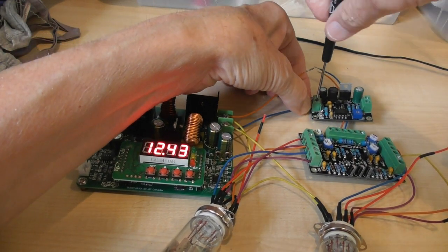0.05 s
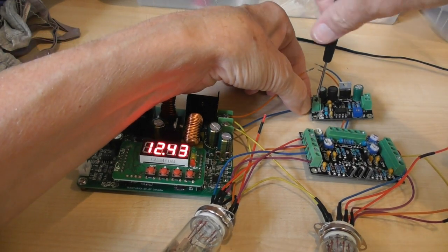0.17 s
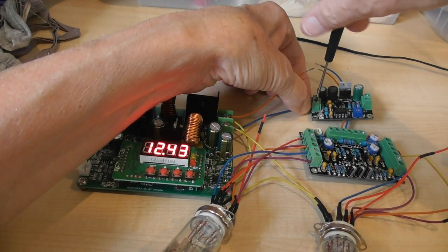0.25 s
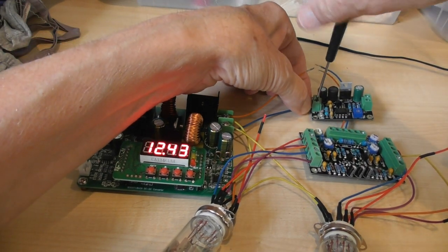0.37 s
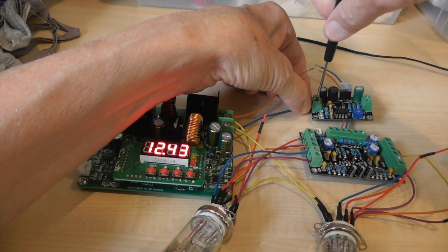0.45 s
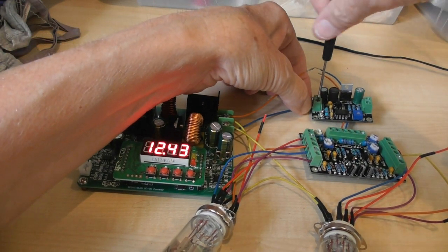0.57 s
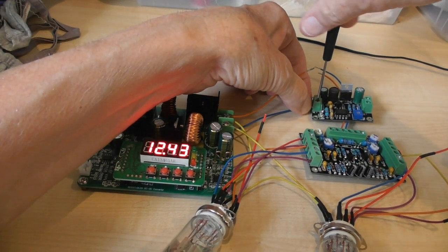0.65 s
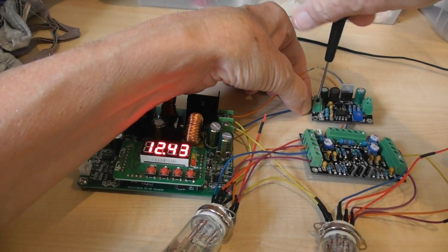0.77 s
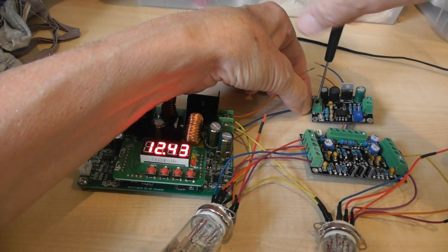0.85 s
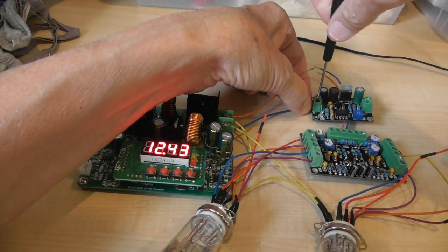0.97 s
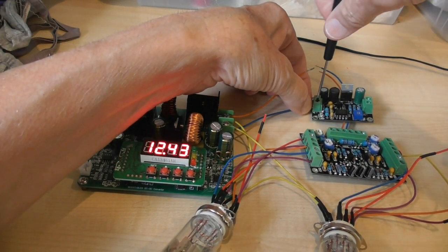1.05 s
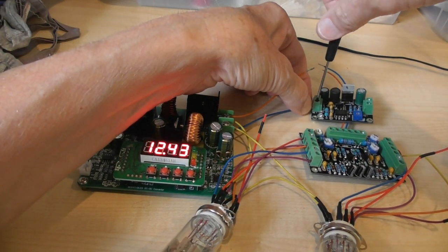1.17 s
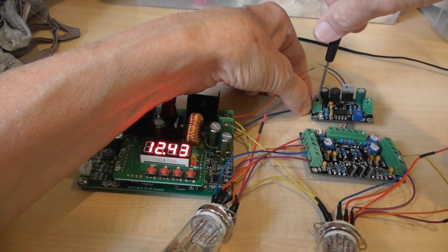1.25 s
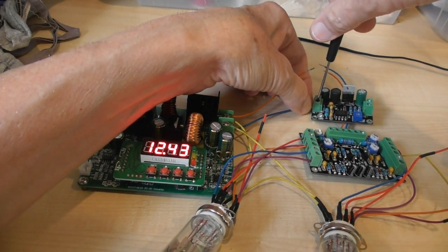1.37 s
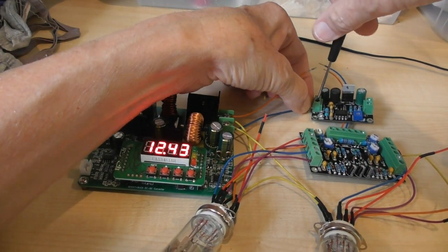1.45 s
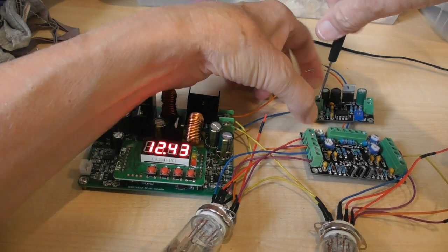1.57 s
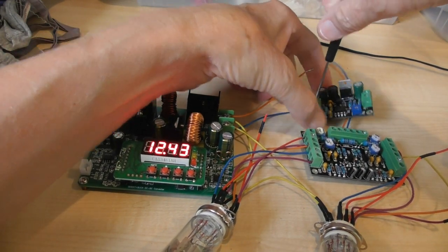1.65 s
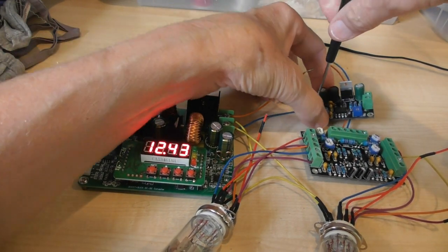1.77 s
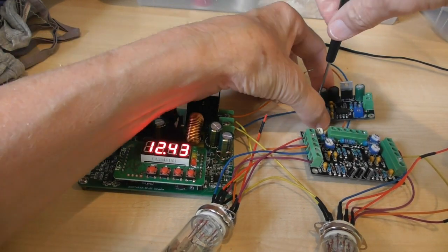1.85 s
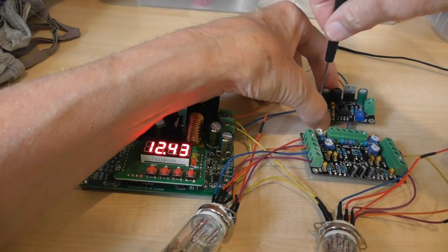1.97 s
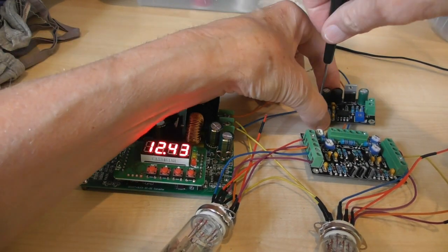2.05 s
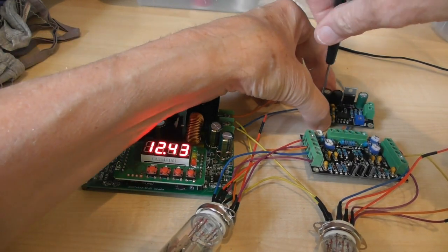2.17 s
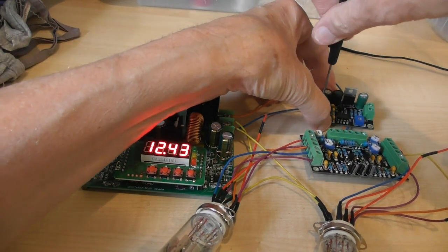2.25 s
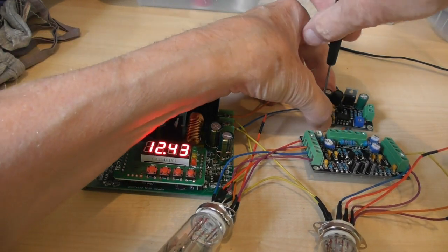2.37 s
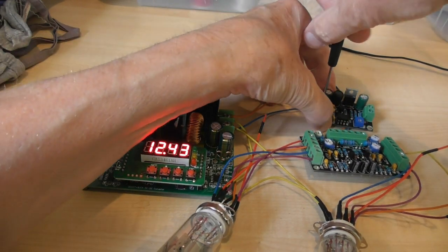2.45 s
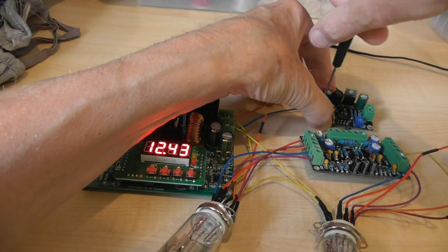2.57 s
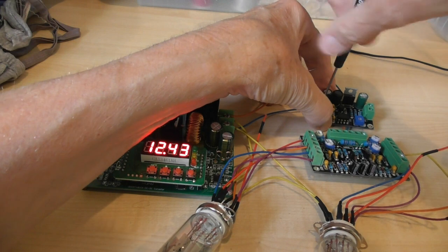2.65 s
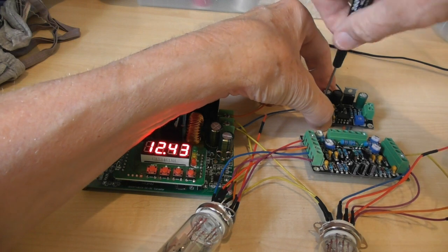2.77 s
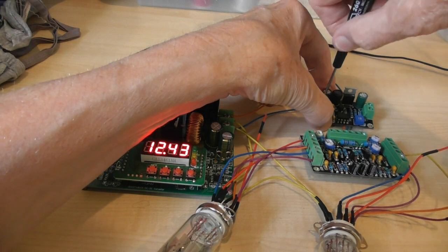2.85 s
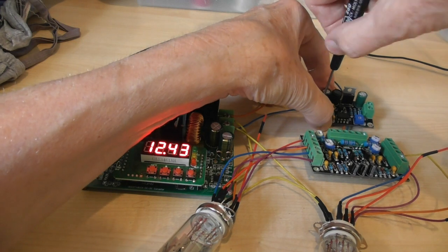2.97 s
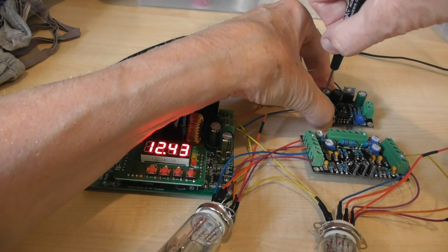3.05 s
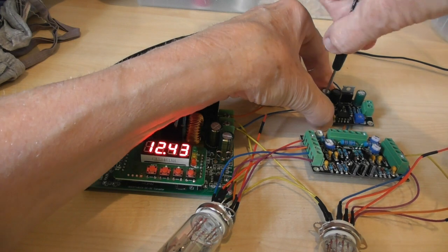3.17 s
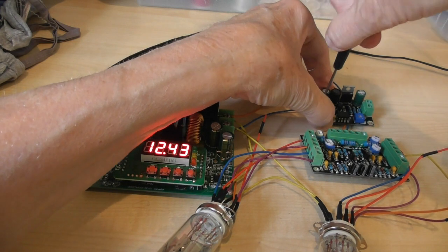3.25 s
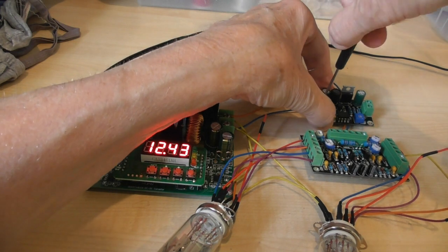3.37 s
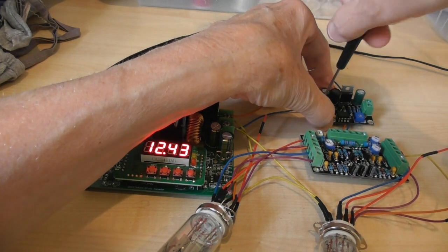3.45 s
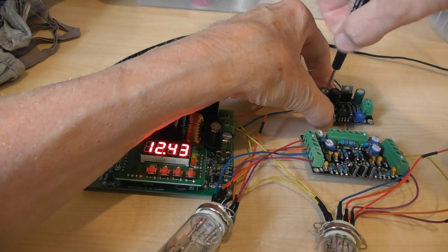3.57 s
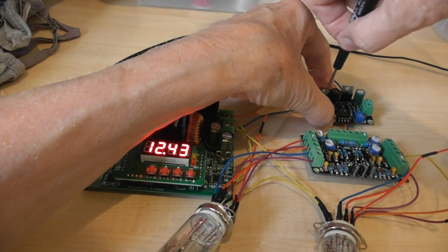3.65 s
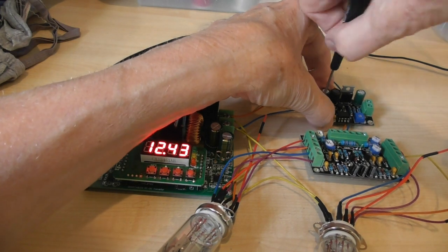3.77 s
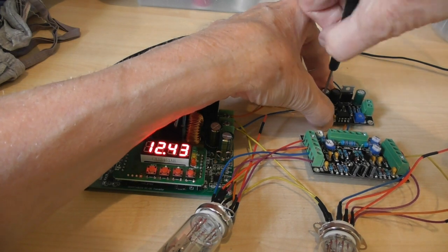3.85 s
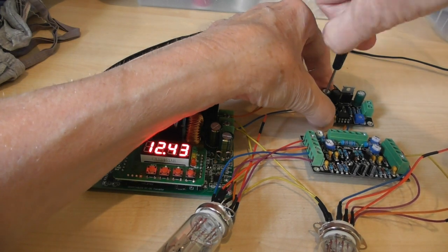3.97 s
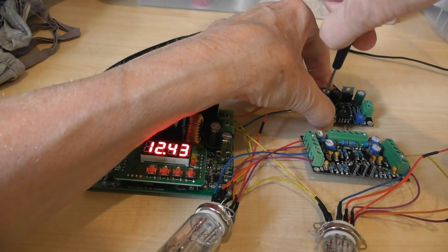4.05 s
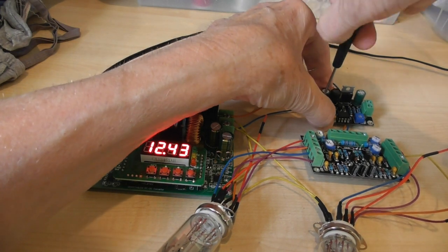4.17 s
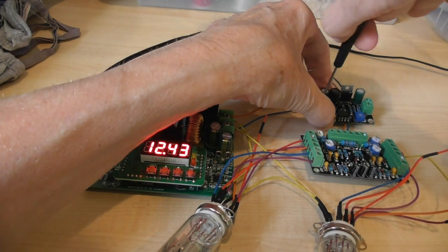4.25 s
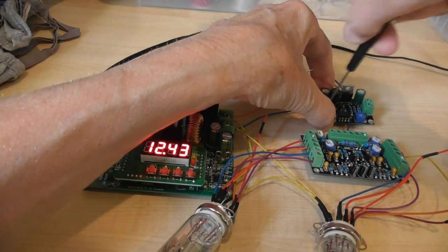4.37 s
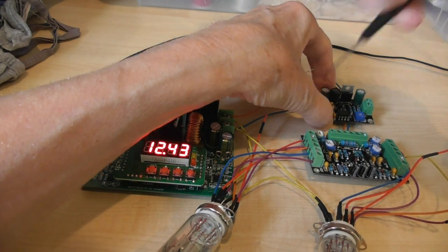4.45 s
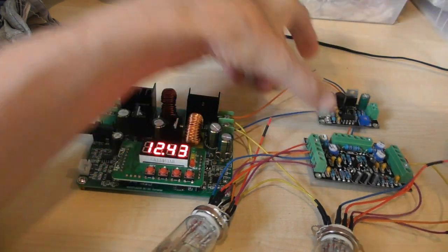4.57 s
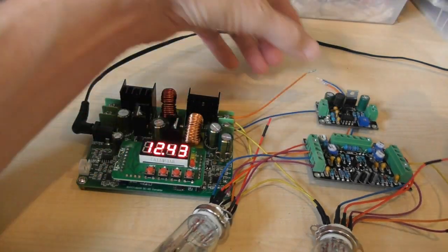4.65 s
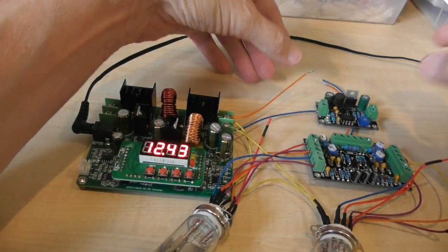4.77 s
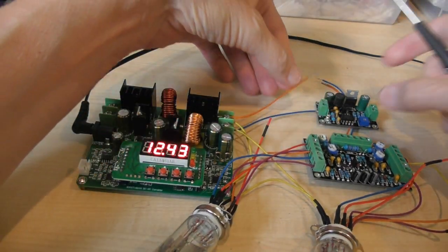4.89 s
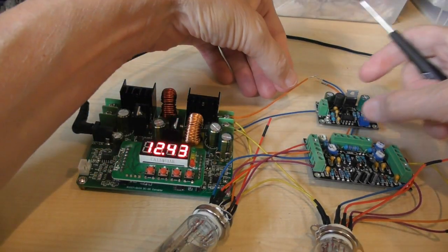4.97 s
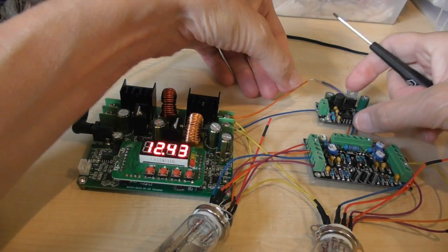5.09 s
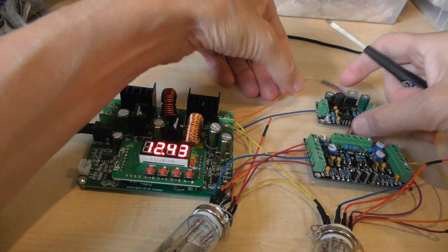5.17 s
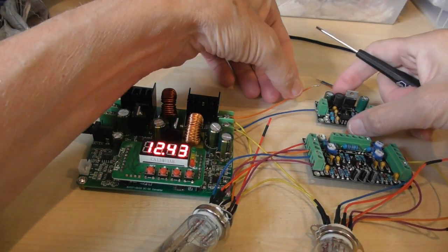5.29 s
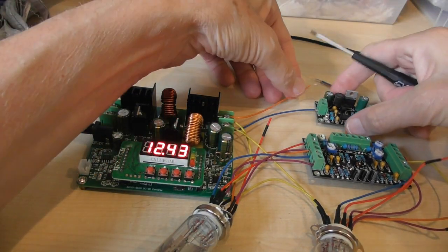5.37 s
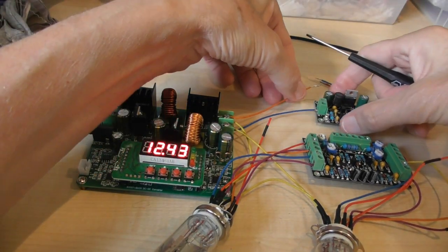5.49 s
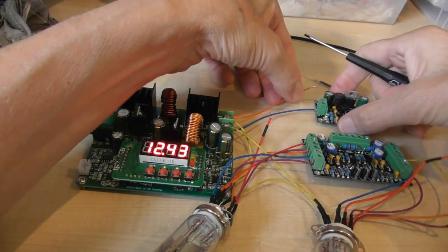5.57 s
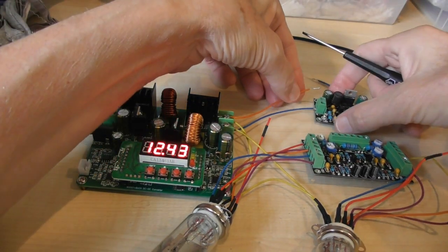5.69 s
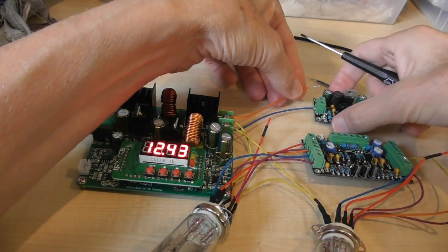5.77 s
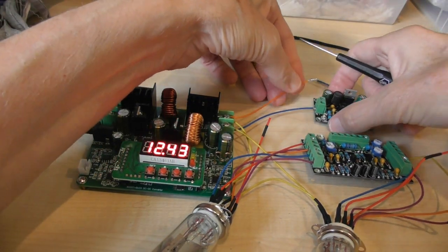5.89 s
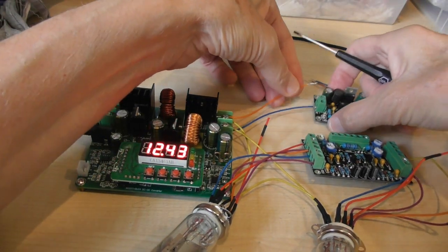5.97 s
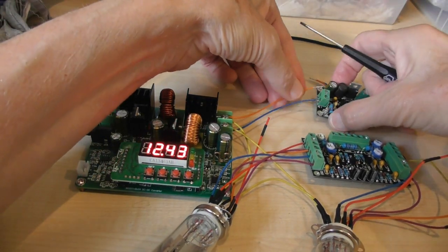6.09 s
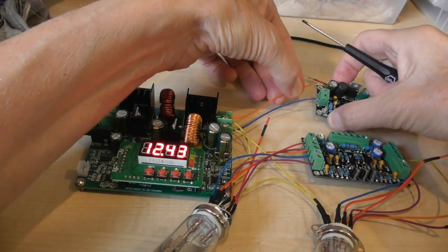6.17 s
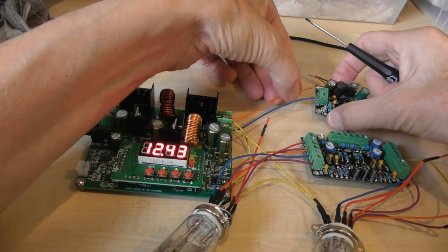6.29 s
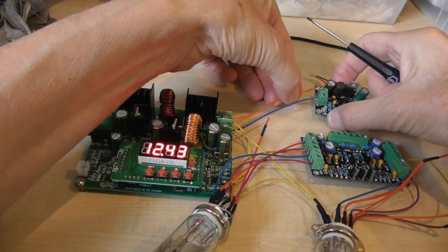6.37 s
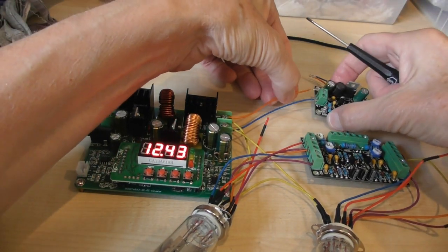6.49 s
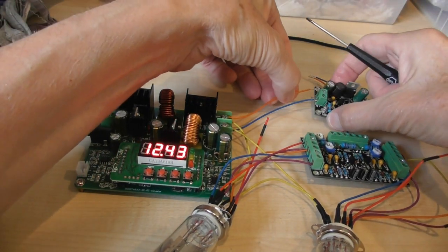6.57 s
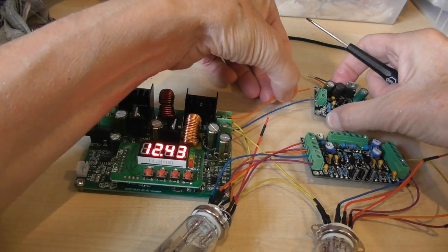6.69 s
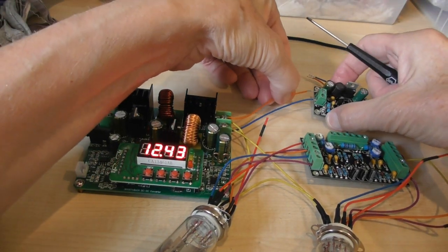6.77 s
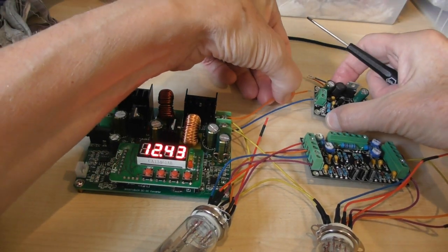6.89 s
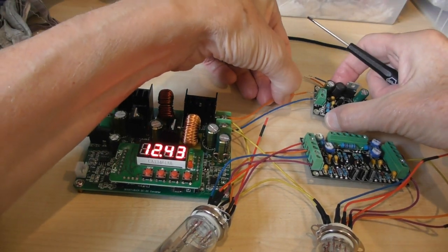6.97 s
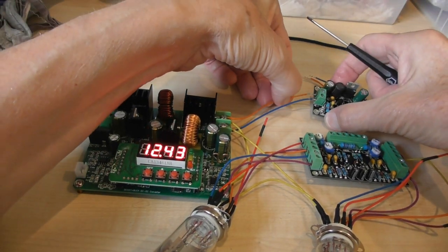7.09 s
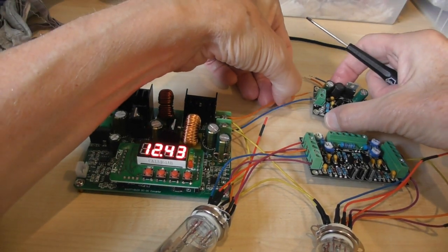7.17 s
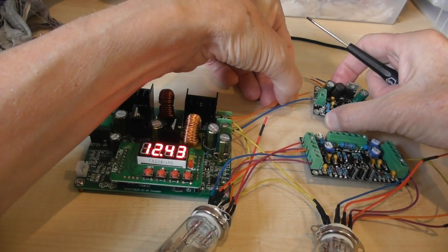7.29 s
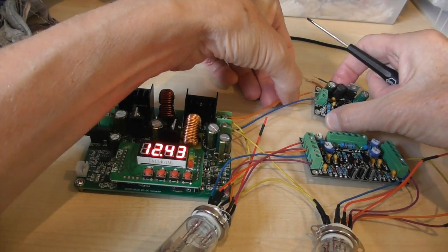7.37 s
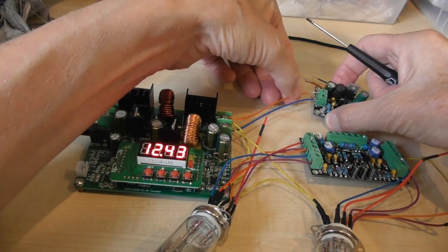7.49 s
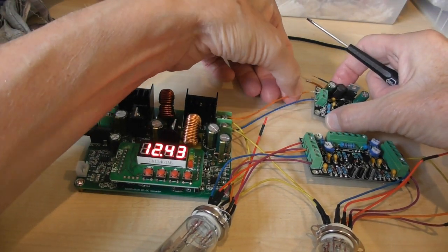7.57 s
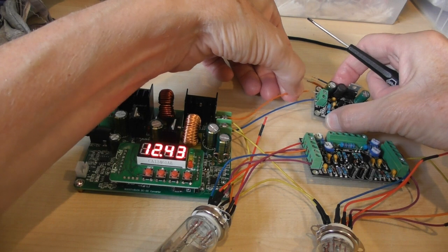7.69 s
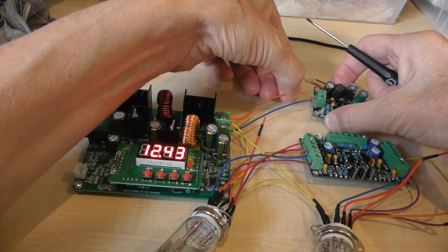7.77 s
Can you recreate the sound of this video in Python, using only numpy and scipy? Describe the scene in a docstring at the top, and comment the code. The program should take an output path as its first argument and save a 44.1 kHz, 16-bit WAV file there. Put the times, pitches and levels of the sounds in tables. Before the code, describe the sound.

A small screwdriver works the screw terminals of a circuit board on a wooden bench. The blade and wire ends tick thinly against metal and plastic while the board drags and knocks lightly on the wood. Early on, a screw gives two faint, high squeaks. The clicks and knocks grow busier and sharper past the middle, then thin out. The sound is close, in a quiet room with a soft, steady hiss.

```python
"""At a wooden bench in a quiet room, a small screwdriver works the screw terminals of a circuit board.
The board drags and knocks on the bench top: friction drives its low modes, and impacts set them ringing.
Blade and wire ends tick against metal and plastic, and twice the screw squeaks by stick-slip in its thread.
Direct sound and short reflections reach two microphone ports over a steady hiss."""
import sys
import numpy as np
from scipy import signal
from scipy.fft import rfft, irfft, next_fast_len
from scipy.io import wavfile
from scipy.ndimage import uniform_filter1d

SR = 44100
rng = np.random.default_rng(int(sys.argv[2]) if len(sys.argv) > 2 else 0)


def int16_out(signal):
    """Quantize to a 16-bit WAV file."""
    q = np.round(np.clip(np.atleast_2d(signal).T, -1, 1) * 32767)
    wavfile.write(sys.argv[1], SR, q.astype(np.int16))


N = 345303

# normal modes of the bench top: f/Hz, level/dB, nominal T60/s
BENCH_MODES = [(212, -12.5, 0.15), (253.8, -7.5, 0.048), (295.4, 0.5, 0.069), (332.7, -3, 0.15),
               (367, -1.5, 0.13), (419.5, -1.5, 0.065), (457.3, -3, 0.13), (550, -12, 0.024),
               (602, 4, 0.017), (749.4, -3, 0.017), (752.6, 4, 0.029), (801, 9, 0.029), (869.6, 9, 0.078),
               (980, -1.5, 0.03), (1230, -16, 0.052), (1228, -5, 0.048), (1832, -4.5, 0.09),
               (2050, -10, 0.04)]
UPPER_MODES_HZ = 600  # hard contact weights the modes above this


def gain_of(db):
    """Amplitude ratio of a level in decibels."""
    return 10 ** (np.asarray(db) / 20)


def unit_rms(x):
    """Normalisation to an rms of 1."""
    return x / np.sqrt(np.mean(x ** 2) + 1e-20)


def curve_at(points, hz):
    """Interpolation on a logarithmic frequency axis."""
    f, value = np.transpose(points)
    return np.interp(np.log(hz + 1), np.log(f + 1), value)


def filtered(x, response):
    """Linear filtering: the spectrum is multiplied by response(f)."""
    n = next_fast_len(x.shape[-1], real=True)
    return irfft(rfft(x, n) * response(np.fft.rfftfreq(n, 1 / SR)), n)[..., :x.shape[-1]]


def coloured(x, spectrum):
    """Spectral shaping by a curve of f/Hz, level/dB."""
    return filtered(x, lambda f: gain_of(curve_at(spectrum, f)))


def resonate(x, hz, width):
    """Forced response of a damped resonator, with gain near 1 at its centre."""
    r = np.exp(-np.pi * width / SR)
    return 2 * signal.lfilter([1 - r], [1, -r * np.exp(2j * np.pi * hz / SR)], x).real


def resonance(f, hz, width):
    """Complex frequency response of one mode, 1 at its centre."""
    return 1 / (1 + 2j * (f - hz) / width)


def add(mix, start, sound):
    """Superposition of a sound from a start time in seconds."""
    part = mix[round(start * SR):][:len(sound)]
    part += sound[:len(part)]


def room_hiss():
    """Stationary noise of room and microphone, as sum (mid) and difference (side) of the two ports."""
    # noise spectra: f/Hz, relative level/dB
    mid_spectrum = [(13, -16), (22, -1.5), (196, 8.5), (351, -1), (450, -24), (594, -3.5), (952, -6.5),
                    (1660, -12), (2070, 2), (2880, -23), (4370, -7), (5010, -20.5), (8490, -2.5),
                    (15200, -6), (16500, -29)]
    side_spectrum = [(13, -37), (22, -1), (181, -3.5), (371, -6.5), (926, -14.5), (2010, -45), (2370, -42),
                     (3310, -67), (6430, -68), (7600, -49), (8970, -31.5), (15200, -24.5), (16500, -51)]
    # narrow hums of the room: f/Hz, bandwidth/Hz, level/dB
    hums = [(43, 8, -77.5), (2050, 85, -93.5), (451, 20, -80.5), (950, 100, -87)]
    mid_noise, side_noise, hum_noise = rng.standard_normal((3, N))
    mid = gain_of(-72) * unit_rms(coloured(mid_noise, mid_spectrum))
    mid += sum(gain_of(db) * unit_rms(resonate(hum_noise, hz, width)) for hz, width, db in hums)
    side = gain_of(-68) * unit_rms(coloured(side_noise, side_spectrum))
    return np.array([mid + side, mid - side])


def friction(slips_per_s, spread_db, smooth, decay_s):
    """Sliding friction: random slips, each a decaying puff of noise, over smooth rubbing."""
    sizes = gain_of(spread_db * np.minimum(rng.exponential(1, N), 3))
    slips = sizes * (rng.random(N) < slips_per_s / SR)
    puffs = signal.lfilter([1], [1, -np.exp(-1 / (decay_s * SR))], slips)
    return unit_rms((unit_rms(puffs) + smooth) * rng.standard_normal(N))


def driven_bench(force, modes):
    """Modal superposition: each mode filters the force, and a broad resonance steepens its skirts."""
    def response(f):
        return sum(gain_of(db) * resonance(f, hz, 2.18 / t60) * resonance(f, hz, .32 * hz)
                   for hz, db, t60 in modes)
    return unit_rms(filtered(force, response))


def handling():
    """Forced vibration: dragging drives the bench modes, small parts scratch, an arm thuds on the wood."""
    # hands moving the board: t/s, drag/dB, hard edge/dB re drag, scratch/dB, arm thud/dB
    moves = [(0.0, -70, -5, -74.5, -79), (0.04, -57, -6, -76, -69), (0.11, -57.5, -9, -70.5, -74),
             (0.28, -52.5, -1.5, -66, -69.5), (0.33, -59, -8, -69, -71), (0.52, -60.5, -8.5, -70.5, -74),
             (0.57, -59, 3, -64.5, -78), (0.7, -62.5, -5, -69.5, -80), (0.98, -56, -7.5, -71.5, -74),
             (1.02, -62.5, 13, -65, -76), (1.09, -54.5, -11, -79, -79), (1.11, -57, -6.5, -66, -81),
             (1.37, -66.5, -6, -78.5, -75), (1.5, -58.5, 0.5, -71, -73), (1.55, -70, -6, -77, -74),
             (1.61, -73, 9, -70, -78), (1.66, -65.5, 2, -74.5, -83), (1.92, -58, -11.5, -71.5, -72),
             (1.98, -52, -0.5, -70, -72), (2.09, -56, -14, -74, -71), (2.16, -52.5, -0.5, -69, -48),
             (2.2, -56, -7, -69, -66), (2.25, -49.5, -11, -61.5, -48), (2.31, -54.5, -5, -65, -66),
             (2.4, -60, -3, -67, -65), (2.44, -54.5, -2, -64.5, -66), (2.51, -57.5, -6.5, -75.5, -76),
             (2.62, -62.5, -12, -71, -68), (2.64, -54, 16, -59, -70), (2.7, -67, 0, -67, -74),
             (2.9, -44, -9, -73, -84), (3.03, -67.5, 2.5, -64, -62), (3.2, -56.5, -8.5, -75, -72),
             (3.25, -63, -3, -72, -52.5), (3.34, -67.5, -5.5, -79, -80), (3.42, -61.5, 6.5, -62.5, -59),
             (3.47, -62.5, -11, -74, -69), (3.51, -56, 18, -58, -76), (3.53, -51.5, -15, -60, -70),
             (3.64, -58, 2.5, -65.5, -80), (3.68, -59.5, -10, -76, -66), (3.71, -62, 23.5, -60, -75),
             (3.73, -47, -7.5, -66, -68), (3.86, -53, -5, -66, -60), (4.01, -63, -7, -74, -69),
             (4.06, -54, 2.5, -66, -58), (4.14, -62, -16, -64.5, -65), (4.19, -73, 5, -70.5, -72),
             (4.23, -66, -19, -75, -66), (4.27, -48, 3, -71, -56), (4.32, -53, -15, -62, -83),
             (4.34, -51, -1, -64, -57.5), (4.49, -58.5, 5, -57.5, -71), (4.51, -56, -4, -65, -75),
             (4.54, -60, 6, -44.5, -73), (4.6, -44, 7.5, -53.5, -67), (4.67, -49, -5, -62.5, -83),
             (4.71, -50, 1, -64.5, -51), (4.73, -63, -23, -63, -65), (4.75, -45.5, 1, -59.5, -46.5),
             (4.86, -54, -10.5, -65, -73), (4.9, -49, -2, -64.5, -76), (5.04, -61.5, -9, -73, -77),
             (5.19, -52.5, 6.5, -67, -71), (5.3, -53.5, -7, -72.5, -62), (5.37, -62.5, -1.5, -73.5, -69),
             (5.54, -59.5, -3.5, -72, -70), (5.69, -59.5, 6.5, -66, -72), (5.78, -54, -7.5, -69, -67),
             (5.8, -55.5, 16, -67, -68), (5.84, -49.5, -6, -70, -73), (5.95, -67, -6, -73, -67),
             (6.06, -54, -1, -67, -74), (6.13, -60, -12, -75.5, -73), (6.28, -73, 0, -77, -75),
             (6.41, -70, -7, -83, -79), (6.48, -85, -1, -66, -83), (6.54, -73.5, -4.5, -79.5, -72),
             (7.0, -75, -4, -81, -80), (7.28, -64, -6, -77.5, -70), (7.61, -87, 12.5, -81, -81),
             (7.83, -62.5, -5, -74, -77)]
    # short rubs of finger or wire: mid t/s, duration/s, drag/dB, hard edge/dB re drag, scratch/dB
    rubs = [(0.188, 0.067, -59, -6, -73.5), (2.924, 0.036, -96, -20, -66.5), (2.165, 0.076, -49, -5.5, -65),
            (4.558, 0.065, -33, -9, -66), (4.769, 0.024, -51, -14, -62), (4.837, 0.032, -59, -4, -63),
            (5.153, 0.042, -38, -2.5, -52), (5.22, 0.098, -55, -14, -63), (5.704, 0.035, -56.5, 9, -96),
            (5.981, 0.049, -50, -9.5, -57), (6.493, 0.054, -63, -3, -80), (6.751, 0.045, -65.5, -7, -68),
            (7.016, 0.033, -70, -9, -69), (7.199, 0.034, -54, -7, -58), (7.414, 0.046, -83, -7, -78),
            (7.76, 0.13, -90, -16, -70)]
    # spectrum of the scratching: f/Hz, relative level/dB
    scratch_spectrum = [(760, -18.5), (1300, -1), (1540, -8), (1620, -10.5), (2420, -5.5), (2710, -13),
                        (3600, -5), (4490, -9.5), (5150, -16.5), (8610, -4.5), (11000, -14.5),
                        (12000, -12.5), (16000, -22)]
    t = np.arange(N) / SR
    times, *levels = np.transpose(moves)
    drag_db, hard_db, scratch_db, thud_db = (np.interp(t, times, level) for level in levels)
    drag_gain, hard_gain, scratch_gain = gain_of([drag_db, drag_db + hard_db, scratch_db])
    for middle, length, rub_db, edge_db, treble_db in rubs:
        stroke = np.exp(-(2 * (t - middle) / length) ** 4)
        drag_gain += gain_of(rub_db) * stroke
        hard_gain += gain_of(rub_db + edge_db) * stroke
        scratch_gain += gain_of(treble_db) * stroke
    force = friction(slips_per_s=240, spread_db=3, smooth=.32, decay_s=.0056)
    low = driven_bench(force, [mode for mode in BENCH_MODES if mode[0] < UPPER_MODES_HZ])
    high = driven_bench(force, [mode for mode in BENCH_MODES if mode[0] >= UPPER_MODES_HZ])
    crackle = friction(slips_per_s=260, spread_db=2.3, smooth=.95, decay_s=.0027)
    scratch = unit_rms(coloured(crackle, scratch_spectrum))
    rumble = resonate(rng.standard_normal(N), hz=106, width=50)
    thud = unit_rms(resonate(rumble, hz=101.5, width=76))
    return drag_gain * low + hard_gain * high + scratch_gain * scratch + gain_of(thud_db) * thud


def board_knocks():
    """Free vibration after impact: the bench rings, and so does the board, at a pitch set by the grip."""
    # board on bench: t/s, peak before the high-pass/dB, board f/Hz, upper modes/dB, board T60 factor
    impacts = [(0.048, -47, 453, -6, 0.67), (0.155, -43.5, 317, -11, 2.8), (0.261, -45, 245, -12, 1.2),
               (0.441, -42.5, 322, -12, 1.3), (0.541, -42.5, 465, -6, 0.73), (0.571, -39, 455, -7, 0.78),
               (0.63, -48, 772, -60, 1.4), (0.649, -40, 865, -22, 1.01), (0.831, -36.5, 462, 5, 1.2),
               (0.92, -63, 355, 0, 0.76), (1.005, -35, 437, 6, 1.1), (1.027, -35, 768, -27, 0.67),
               (1.114, -45, 872, -12, 1.1), (1.136, -40, 271, -24, 0.84), (1.493, -40.5, 860, -23, 1.01),
               (1.593, -30, 833, -11, 0.66), (1.641, -46, 314, -16, 1.5), (1.785, -43.5, 248, -4, 0.84),
               (1.964, -43, 470, -12, 0.78), (2.114, -32.5, 356, -12, 0.57), (2.14, -39, 302, -16, 1.01),
               (2.183, -45, 264, -8, 1.01), (2.412, -42.5, 802, -19, 0.64), (2.638, -28, 790, -21, 0.63),
               (2.78, -37.5, 764, -27, 0.58), (2.945, -58, 767, -7, 3), (3.017, -44.5, 321, -22, 1.4),
               (3.097, -47, 307, -8, 1.7), (3.238, -53, 245, -23, 0.79), (3.396, -40.5, 234, -21, 0.38),
               (3.497, -26, 450, -8, 0.34), (3.567, -38, 749, -7, 0.85), (3.695, -23.5, 742, -25, 0.83),
               (3.825, -45, 314, -8, 1.4), (3.923, -41, 248, -6, 0.42), (4.021, -45, 231, -8, 0.83),
               (4.056, -31, 420, -24, 0.45), (4.188, -32, 251, -10, 0.73), (4.255, -33.5, 425, -8, 0.93),
               (4.355, -31.5, 442, -5, 0.71), (4.477, -33.5, 476, 5, 1.14), (4.529, -26, 374, 13, 1.2),
               (4.55, -28, 374, 13, 1.6), (4.602, -22.5, 427, 12, 0.71), (4.629, -35.5, 305, -16, 2),
               (4.753, -41, 802, -23, 1.6), (4.881, -42.5, 334, -16, 0.93), (5.075, -35.5, 372, -3, 0.84),
               (5.13, -27.5, 344, -14, 1.6), (5.15, -29, 448.5, -15, 1.5), (5.185, -37.5, 868, -15, 3),
               (5.213, -29, 417, -14, 1.1), (5.466, -35, 322, 0, 0.59), (5.524, -53, 473, -22, 1.3),
               (5.584, -35, 355, 3, 0.64), (5.61, -36, 360, -11, 2.2), (5.697, -38, 452, -2, 1.4),
               (5.795, -31.5, 415, 8, 0.69), (6.044, -40.5, 885, -8, 0.79), (6.068, -31, 416, -29, 1.9),
               (6.288, -45, 439, -8, 0.86), (6.496, -49, 280, -16, 1.01), (7.338, -63, 320, -7, 1.01),
               (7.628, -54, 896, -12, 0.55), (7.729, -47.5, 277, -8, 1.7)]
    out, t = np.zeros(N), np.arange(8000) / SR
    hz, db, t60 = np.transpose(BENCH_MODES)[:, :, None]
    rise = (1 - np.exp(-t / .0013)) ** 2  # the top takes a moment to swing
    for start, peak_db, board_hz, hard_db, ring_factor in impacts:
        # the spot struck differs each time
        scatter_db, shift, detune = rng.standard_normal((3, len(BENCH_MODES), 1))
        octaves_away = abs(np.log2(hz / board_hz))
        mode_db = db - 5 * octaves_away + scatter_db + hard_db * (hz > UPPER_MODES_HZ)
        # hands damp the first swing; a weaker tail rings on
        decay = gain_of(-60 * t / (.4 * t60)) + .2 * gain_of(-60 * t / (1.4 * t60))
        phase = 2 * np.pi * hz * (1 + .015 * detune) * t + shift / 3
        bench = (gain_of(mode_db) * decay * np.sin(phase)).sum(0)
        board = gain_of(-60 * t / (.076 * ring_factor)) * np.sin(2 * np.pi * board_hz * t)
        knock = (bench / abs(bench).max() + .33 * board) * rise
        add(out, start, gain_of(peak_db) * knock / abs(knock).max())
    return signal.lfilter(*signal.butter(2, 140, "high", fs=SR), out)  # a thin top radiates little bass


def blade_ticks():
    """Transient excitation: a snap and rattle give a crack of plastic, a ping of the blade and a fizz."""
    # blade and wire ends on metal and plastic:
    # t/s, nominal peak/dB, fizz f/Hz, ping f/Hz, crack/dB re peak, ping/dB re peak, rattle T60/s
    contacts = [(0.2654, -48.5, 8150, 2440, -1, -22, 0.022), (0.3541, -52, 9340, 4680, -25, -17, 0.018),
                (0.3775, -47, 10900, 4640, -11, -12, 0.045), (0.4409, -41.5, 7800, 3940, -2.5, -2.5, 0.043),
                (0.5457, -58, 9150, 3990, -15, -22, 0.018), (0.5736, -48, 9700, 4710, -16, -21, 0.015),
                (0.6734, -48, 7980, 3350, -20, -18, 0.018), (0.6994, -44, 6550, 4700, -33, -6, 0.0086),
                (0.8307, -39.5, 7660, 4640, -17, -8.5, 0.054), (0.883, -49, 6860, 4750, -23, -5, 0.016),
                (0.9295, -46, 9000, 3700, -7.5, -11, 0.02), (1.004, -47, 8640, 2500, -5, -17, 0.018),
                (1.4206, -53, 7440, 4260, -7, -17, 0.018), (1.477, -47.5, 9400, 4320, -30, -31, 0.02),
                (1.5944, -41, 7200, 2450, -14, -6.5, 0.018), (1.6298, -51, 10100, 3580, -9, 0, 0.024),
                (1.6382, -47, 7860, 3800, -8, -1, 0.025), (1.8984, -51.5, 8670, 3360, -7, -7, 0.019),
                (2.14, -46, 8150, 3850, -8, -6, 0.025), (2.1784, -29, 9100, 3860, -28, -12, 0.026),
                (2.64, -36, 8450, 3740, -4, -10, 0.025), (2.742, -48, 7120, 3450, -14, -16, 0.023),
                (2.7665, -42.5, 9120, 3860, -7, -0.5, 0.021), (2.892, -45, 10800, 4530, -29, -16, 0.018),
                (2.9512, -46.5, 6990, 4300, -24, -2, 0.026), (3.0112, -44, 8700, 4360, -11.5, -1.5, 0.04),
                (3.2532, -40, 7400, 3480, -7, -7, 0.015), (3.3532, -54, 8770, 3990, -3, 1, 0.02),
                (3.414, -38.5, 7500, 3560, -27, -12, 0.045), (3.497, -33.5, 7900, 3800, -4, -7, 0.011),
                (3.5732, -25, 8900, 3340, -22, -8, 0.012), (3.6984, -34.5, 10000, 3530, -7.5, -6.5, 0.029),
                (3.9285, -33.5, 7860, 4120, -23, -5, 0.028), (4.0073, -51, 7740, 3500, -9, -5, 0.054),
                (4.0585, -20, 7330, 3260, -8, -13.5, 0.0085), (4.2543, -45, 8460, 3460, 5.5, -6.5, 0.054),
                (4.357, -14.5, 8500, 3960, -23, -9, 0.023), (4.3809, -42, 9220, 2730, -21, 4.5, 0.018),
                (4.394, -40.5, 8800, 3670, -21, 1, 0.018), (4.4794, -43, 8590, 3840, -1, -16, 0.018),
                (4.5111, -43, 9670, 3900, -21, -25, 0.02), (4.5261, -32.5, 9050, 3760, -7, -23, 0.02),
                (4.5544, -24.5, 8700, 3260, -8, -26, 0.026), (4.6053, -26.5, 8100, 3740, -2.5, -8, 0.027),
                (4.6274, -35, 8700, 3580, -8, -20, 0.024), (4.6374, -42, 8490, 2450, -14, -16, 0.034),
                (4.744, -41, 7550, 3480, -24, -22, 0.046), (4.7501, -38, 9220, 2560, -8, -18, 0.046),
                (4.8364, -37, 5960, 3930, -26, -22, 0.035), (4.8854, -46.5, 7430, 4360, -16, -5, 0.034),
                (4.9316, -36, 7400, 4160, -13, -9.5, 0.032), (5.031, -49, 7200, 4970, -11, -14, 0.026),
                (5.0747, -48, 8280, 3400, 0, -5.5, 0.018), (5.1292, -36, 7430, 4830, -16, -15, 0.054),
                (5.1374, -31.5, 8790, 4370, -2, -17, 0.044), (5.1531, -25.5, 8040, 4430, -22, -13, 0.027),
                (5.165, -40, 8480, 3660, -1, -20, 0.018), (5.1845, -34.5, 7400, 4740, -0.5, -19, 0.042),
                (5.212, -38, 8520, 2400, -2, -26, 0.018), (5.222, -30, 8700, 3570, -14, -26, 0.022),
                (5.239, -42.5, 8850, 3730, -9, -5, 0.015), (5.3976, -50, 8730, 3740, -22, -5, 0.018),
                (5.465, -47, 8100, 3180, 2, -16, 0.029), (5.5325, -33.5, 9000, 3430, -24, -25, 0.028),
                (5.678, -48, 8060, 2980, -20, -22, 0.018), (5.6997, -50, 8790, 4700, -14, -7, 0.016),
                (5.793, -51, 8750, 2470, 6, -26, 0.022), (6.0674, -45.5, 10300, 3490, 3.5, -11, 0.034),
                (6.0896, -51, 8880, 4370, 0, -0.5, 0.018), (6.4716, -34.5, 7300, 4000, -36, -10.5, 0.015),
                (6.6147, -44.5, 8800, 4000, -20, -16, 0.025), (6.641, -49.5, 6530, 3950, -23, -6, 0.031),
                (6.8664, -54.5, 8560, 4340, -11, -5, 0.018), (7.1697, -53.5, 8060, 2430, -13, -13, 0.029),
                (7.341, -42.5, 7240, 4300, -13, -5, 0.02), (7.448, -46.5, 8800, 4270, -23, -8, 0.027),
                (7.6815, -46.5, 9000, 4330, -30, -30, 0.018)]
    # small parts as the microphone colours them: f/Hz, level/dB (applied at half its value)
    brightness = [(710, -16), (1200, -20), (1350, 0), (1510, -66), (1930, -26.5), (2180, -10.5),
                  (2860, -33), (3910, -27.5), (5130, -27.5), (5590, -2), (6160, -5.5), (7910, 8.5),
                  (8910, 9.5), (13300, 1.5), (16000, -3.5)]
    size, lead_in = 4096, 64  # samples
    out, t, f = np.zeros(N), np.arange(size) / SR, np.fft.rfftfreq(size, 1 / SR)
    snap = .9 * gain_of(-60 * t / .004)
    tail = gain_of(-22.5 - 60 * t / .2)
    colour = gain_of(.5 * curve_at(brightness, f))
    window = np.interp(np.arange(size), [40, lead_in, 3000, 3800], [0, 1, 1, 0])
    for start, peak_db, fizz_hz, ping_hz, crack_db, ping_db, t60 in contacts:
        envelope = snap + gain_of(-60 * t / t60) + tail
        burst = rfft(np.roll(rng.standard_normal(size) * envelope, lead_in))
        crack = abs(resonance(f, 1515, width=1230)) ** 3
        blade_ring = gain_of(5) * resonance(f, ping_hz, width=230)
        ping = abs(resonance(f, ping_hz, width=1680)) ** 3 + blade_ring
        broad_fizz = gain_of(-7.5) * abs(resonance(f, 9000, width=10400)) ** 2
        fizz = abs(resonance(f, fizz_hz, width=.3 * fizz_hz)) ** 2 + broad_fizz
        parts = irfft(burst * colour * [crack, ping, fizz]) * window
        fizz_gain = np.sqrt(np.clip(1 - gain_of(2 * ping_db) - .5 * gain_of(2 * crack_db), .03, 1))
        weights = np.array([gain_of(crack_db), gain_of(ping_db), fizz_gain]) / abs(parts).max(1)
        add(out, start - lead_in / SR, gain_of(peak_db) * weights @ parts)
    return out


def screw_squeaks():
    """Stick-slip in the thread drives narrow modes: a high whistle, and lower tones as the screw bites."""
    # one list for each turn of the screw: t/s, whistle/dB, bite on the lower tones/dB
    turns = [
        [(1.39, -101, 5), (1.412, -72, -4), (1.462, -68, -11), (1.466, -72, -3), (1.532, -69.5, -3),
         (1.56, -93, -1)],
        [(1.72, -89, -5), (1.73, -71, -10), (1.748, -67, -3), (1.822, -79, 6), (1.834, -93, 3), (1.9, -88, 9)],
    ]
    # modes of the thread: f/Hz, nominal bandwidth/Hz, relative level/dB
    thread_modes = [(3580, 80, -14), (4700, 90, -15), (7540, 63, -1), (8660, 140, 0.5), (10100, 140, -4),
                    (12000, 120, 2)]
    out = np.zeros(N)
    for turn in turns:
        times, *levels = np.transpose(turn)
        t = np.arange(times[0], times[-1], 1 / SR)
        level_db, bite_db = (np.interp(t, times, level) for level in levels)
        noise, jitter = rng.standard_normal((2, len(t)))
        flutter_db = 3.5 * unit_rms(uniform_filter1d(jitter, 200))
        slips = noise * gain_of(flutter_db)
        ring = sum(gain_of(db + bite_db * (hz < 11000)) * unit_rms(resonate(slips, hz, .99 * width))
                   for hz, width, db in thread_modes)
        add(out, times[0], gain_of(level_db) * ring * signal.windows.tukey(len(t), .1))
    return out


def direct_sound(source):
    """Differences of level and phase between the two ports give the source its direction."""
    # level difference: f/Hz, left minus right/dB
    level_difference = [(60, 4.4), (250, 4.8), (500, 1.5), (1000, -.6), (4000, -.5), (8000, -2.5),
                        (13000, .4)]
    # phase difference: f/Hz, lead of the left port/rad
    phase_lead = [(100, -.6), (300, -.7), (600, -.65), (1200, -.55), (2200, -.32), (4500, -.12), (6500, .2),
                  (8500, .75), (12000, 1.5), (15500, 1.2)]

    def port(share):
        return filtered(source, lambda f: gain_of(share * curve_at(level_difference, f))
                        * np.exp(1j * share * curve_at(phase_lead, f)))
    return np.array([port(.5), port(-.5)])


def reflections(source, t60=.14):
    """Diffuse reverberation: sparse decaying echoes of random sign, uncorrelated at the two ports."""
    # reflected sound: f/Hz, level/dB re source
    echo_spectrum = [(60, -9), (300, -16), (900, -14), (2000, -21), (4000, -28), (8000, -17), (15000, -8)]
    taps = np.zeros((2, 11000))
    delays = np.arange(40, 10980, 20) + rng.integers(0, 20, (2, 547))  # one echo in every 20 samples
    np.put_along_axis(taps, delays, rng.choice([-1., 1.], delays.shape), 1)
    taps *= gain_of(-60 * np.arange(11000) / SR / t60)
    echoes = signal.fftconvolve(source[None], taps / np.linalg.norm(taps[0]), axes=1)[:, :N]
    return coloured(echoes, echo_spectrum)


def scene():
    """Superposition of the direct and reflected sound of the bench work with the background noise."""
    work = board_knocks() + blade_ticks() + handling() + screw_squeaks()
    return direct_sound(work) + reflections(work) + room_hiss()


def record(dry):
    """Band limiting: a linear-phase low-pass filter at 16 kHz."""
    low_pass = signal.firwin(255, 16000, window=("kaiser", 8), fs=SR)
    return signal.oaconvolve(dry, low_pass[None], "same")


dry = scene()
out = record(dry)
int16_out(out)
```